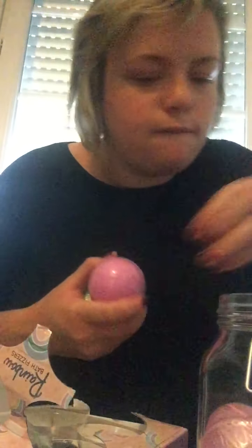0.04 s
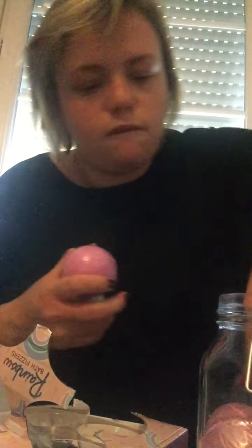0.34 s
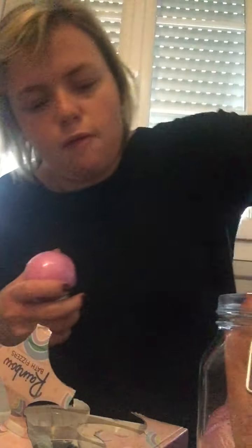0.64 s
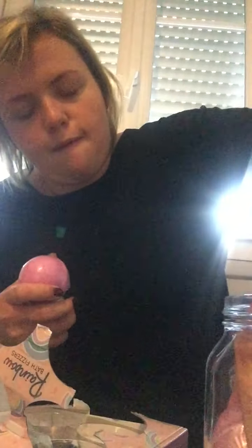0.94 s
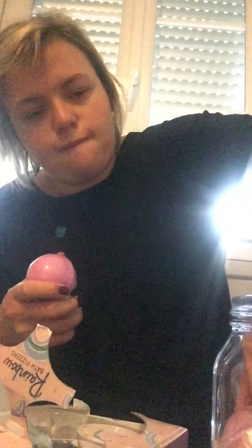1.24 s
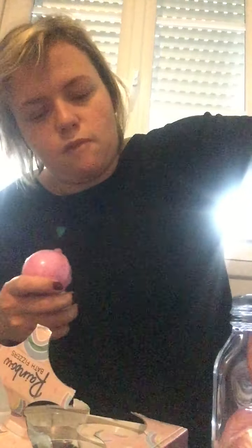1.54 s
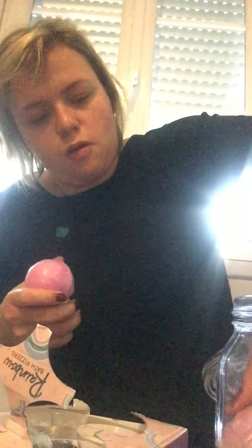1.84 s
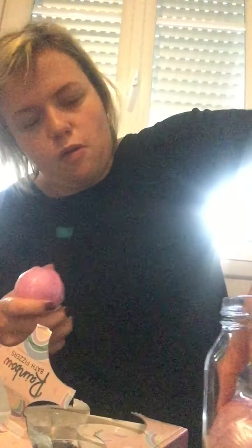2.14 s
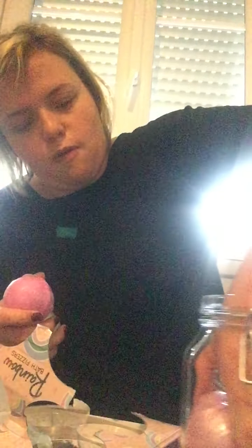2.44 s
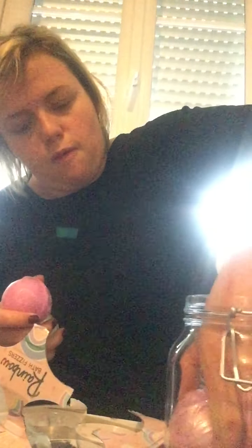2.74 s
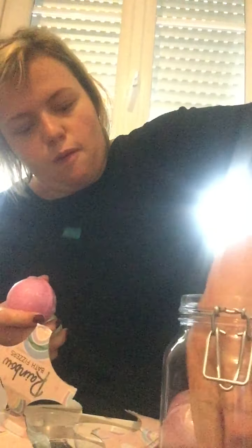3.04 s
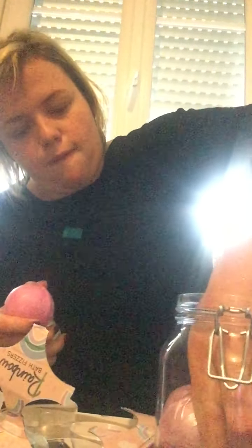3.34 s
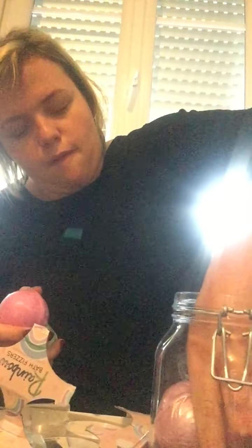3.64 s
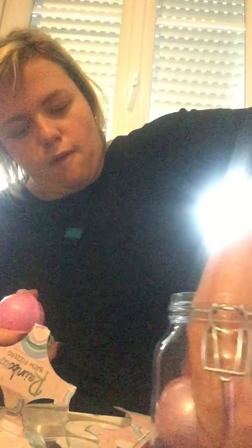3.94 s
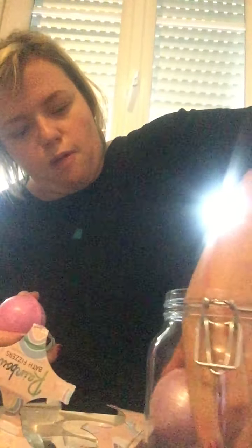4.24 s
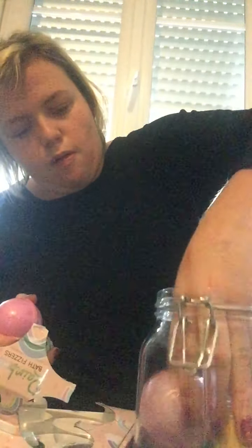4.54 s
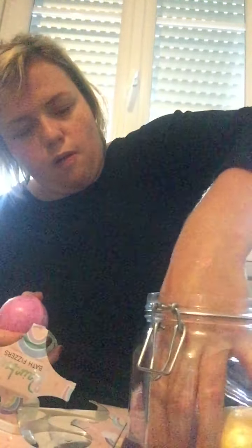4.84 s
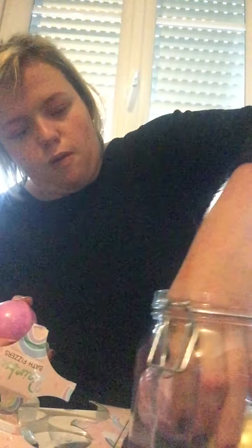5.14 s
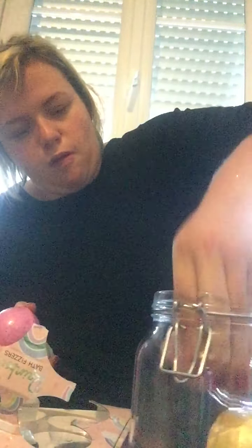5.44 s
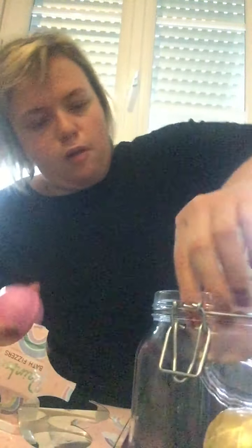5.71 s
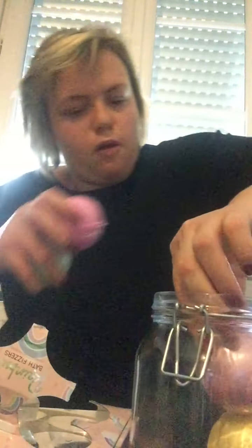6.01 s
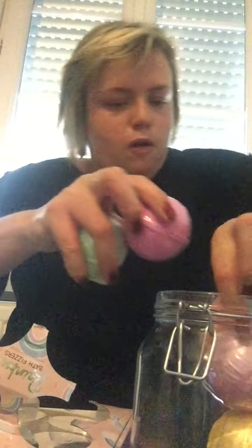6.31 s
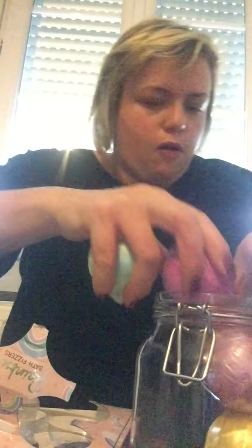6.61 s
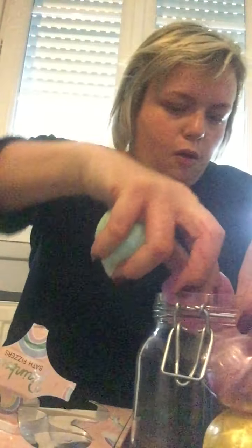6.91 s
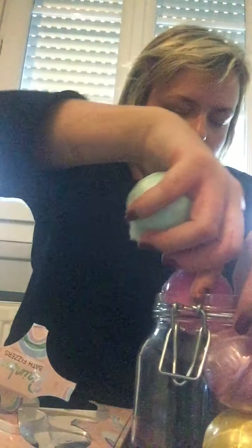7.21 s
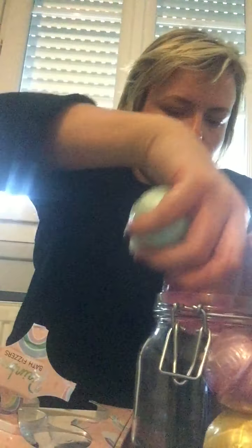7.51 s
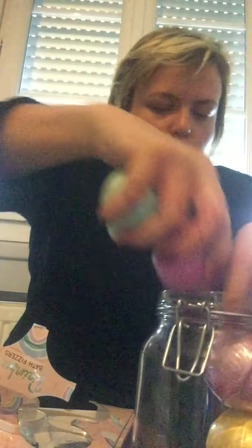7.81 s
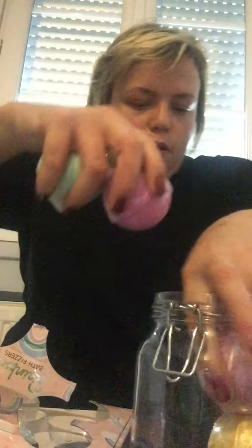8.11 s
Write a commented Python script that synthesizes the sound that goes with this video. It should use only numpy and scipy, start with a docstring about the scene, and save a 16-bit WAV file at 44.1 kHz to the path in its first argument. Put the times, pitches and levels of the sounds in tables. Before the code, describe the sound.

A hand packs wrapped balls into a glass jar: clusters of clinks and hollow bumps, separated by soft scraping and fingernail ticks.

```python
"""A small room, the microphone close to a big glass jar on a table. A hand packs hard round bath bombs in.
Balls, fingernails and a wire clasp clink on the glass, and the balls clack as they spring off the wall. Soft
bumps shake the table and sound the air in the jar, lower as the hand covers its mouth. In between, the wrapped
balls and the arm rub along the wall and the wrapping crackles. Behind it all are the echoes of nearby walls and
a faint hush."""
import sys
import numpy as np
from scipy import signal
from scipy.fft import rfft, irfft, next_fast_len
from scipy.io import wavfile
from scipy.ndimage import uniform_filter1d

SR = 44100
rng = np.random.default_rng(int(sys.argv[2]) if len(sys.argv) > 2 else 0)


def pcm_store(signal):
    """Save signal as 16-bit PCM."""
    levels = np.round(np.clip(np.atleast_2d(signal), -1, 1) * 32767)
    wavfile.write(sys.argv[1], SR, levels.astype(np.int16).T)


N = 364266
TIME = np.arange(N) / SR
AGE = TIME[:SR]  # seconds since an event began

# modes of the jar's wall: f/Hz, level/dB, t60/s
GLASS_MODES = [(1030, -5, .1), (1165, -4, .2), (1240, -6, .15), (1390, -10, .17), (1470, -13, .17),
               (1810, -4, .24), (1860, 2, .24), (1900, 1, .22), (1945, 2, .22), (2020, -2, .22),
               (2295, -5, .13), (2470, -10, .12), (2800, -16, .14), (3610, -6, .18), (3740, -3, .26),
               (3915, -3, .14), (3985, -2, .19), (4505, -1, .08), (5250, -10, .12), (5390, -7, .12),
               (5800, -9, .08), (6455, -12, .1), (6870, -13, .12), (7080, -15, .1), (7680, -12, .08),
               (9470, -4, .06), (12590, -16, .04)]
# spectrum of the dense, short-lived modes in the first crack: f/Hz, level/dB
CRACK_SPECTRUM = [(700, 1.5), (1100, -1), (1500, 1), (1950, 13), (2350, 6.5), (2850, -5.5), (3750, 2),
                  (4800, -10), (5500, -5), (7400, -7.5), (8600, -15.5), (9600, -11.5), (16000, -15.5)]
# a ball meets the glass, close up: t/s, level/dB at 1.5-3 kHz, body/dB re that band, cut-off/Hz, ring/dB
CLINKS = [(0.295, -57.5, -0.5, 4830, 0), (0.7588, -58, -8, 6130, 0.5), (0.8769, -58.5, -2, 3960, -21),
          (1.4731, -52, -10, 2450, -2), (1.5273, -55.5, -3.5, 8800, -10), (1.8735, -50, -13, 2100, -3),
          (2.228, -44, 2, 2700, -11.5), (2.519, -53, -9, 3170, -46), (2.6057, -49, -6, 3030, -18),
          (2.6933, -42.5, -3.5, 3430, -40), (3.556, -56.5, -25, 5460, -29), (3.998, -53, -19, 8000, -4),
          (4.0295, -35, -2.5, 6500, -15.5), (4.067, -43.5, 4, 3500, -10), (4.0971, -20, -2.5, 3400, -14),
          (4.132, -38, -1, 3840, -16), (4.6396, -41, -2, 7150, 5), (4.645, -43, -6.5, 7450, -8),
          (4.809, -40.5, 0.5, 2800, -14.5), (4.8338, -48, -2, 4100, -16),
          (5.5512, -47.5, -6.5, 5300, -10.5), (5.836, -51, -3, 3540, -6), (5.9703, -26.5, 1, 3720, -10.5),
          (6.3189, -56, 7.5, 3560, -5), (6.4015, -58, 1, 5000, 11.5), (6.5851, -55.5, -18.5, 3870, 4.5),
          (6.8717, -39.5, -3.5, 1867, -7), (7.603, -45.5, -16, 7460, -15.5),
          (7.7869, -43.5, -12, 2660, -22), (7.9428, -45.5, -15.5, 3650, 6), (8.001, -51.5, -1.5, 3670, 13),
          (8.1032, -39, -16, 7600, -12), (8.133, -49, 3, 3700, 11), (8.1735, -42, -2, 7300, -7),
          (8.2047, -25, -1.5, 2750, -10.5), (8.244, -41.5, -20, 6500, -14)]
def clinks(crack_t60=0.029, touch_s=0.0031, hard_blow_db=-22, ring_trim_db=10, trim_db=1.5):
    """A hard contact: a gritty crack, a rattle of the pile, and the wall's ring, damped by the hand."""
    out = np.zeros(N)
    rise = onset(0.001)
    free_share = 0.18  # of the ring escapes the hand
    grip = rise * (free_share + (1 - free_share) * fade(0.15))
    # the glass ring wavers, each mode fading unevenly as heard through the room
    wall = ringing(GLASS_MODES) * (1 + 2.6 * waver(len(GLASS_MODES), rate_hz=80))
    for start, db, body_db, cutoff_hz, ring_db in CLINKS:
        grit_times = AGE[::50]
        grit = undb(3 * np.interp(AGE, grit_times, rng.standard_normal(len(grit_times))))
        # the harder the blow, the longer the ball chatters on the glass and the more the pile rattles
        force = undb(0.64 * (db - hard_blow_db))
        contact = np.minimum(fade(crack_t60) * undb(60 * touch_s * force / crack_t60), 1)
        rattle = force * undb(-21) * fade(0.2)
        crack = peak(crack_noise() * grit * rise * (contact + rattle), 0)
        detune = 1 + 0.009 * rng.uniform(-1, 1)  # the load on the wall differs each time
        ring = np.interp(AGE * detune, AGE, strike(wall))
        sound = crack + peak(ring * grip, ring_db + ring_trim_db)
        add(out, start, set_bands(sound, db + trim_db, contact_tone(body_db, cutoff_hz)))
    return out


def crack_noise(scatter_db=3):
    """Every spot on the jar favours other overtones: noise with chance peaks and dips."""
    hz, db = np.transpose(CRACK_SPECTRUM)
    grid_hz = np.geomspace(hz[0], hz[-1], 40)
    spot_db = np.interp(np.log(grid_hz), np.log(hz), db) + scatter_db * rng.standard_normal(len(grid_hz))
    return colour(rng.standard_normal(SR), np.column_stack([grid_hz, spot_db]))


def contact_tone(body_db, cutoff_hz, fall_db_per_octave=17):
    """Body, middle, bright and top band in dB re the middle: a softer contact lasts longer, so is duller."""
    octaves = np.log2(np.array([2100, 3900, 8000]) / cutoff_hz)
    loss_db = 10 * np.log10(1 + undb(2 * fall_db_per_octave * octaves))
    return np.append(body_db, loss_db[0] - loss_db)


# edges of a contact's body, middle, bright and top band: f/Hz
BAND_EDGES = [700, 1500, 3000, 5000, 16000]
def set_bands(sound, db, tone):
    """Set the peak level of each of the four bands of a contact."""
    bands = zip(BAND_EDGES, BAND_EDGES[1:], tone)
    return sum(peak(band(sound, lo, hi, order=3), db + tone_db) for lo, hi, tone_db in bands)


# modes of the table under the jar: f/Hz, level/dB, t60/s
TABLE_MODES = [(55, -19, .22), (79, -11, .22), (101, -11, .2), (127, -2, .4), (165, -7, .2), (190, -5, .3),
               (222, -5, .22), (255, -7, .15)]
# soft bumps on the jar: t/s, level/dB, air note f/Hz, thud/dB and table/dB (both added to the level)
BUMPS = [(0.123, -56.5, 373, -2, -44), (0.143, -55, 331, -3, -35), (1.499, -52, 367, -6.5, -35),
         (4.041, -30, 378.6, 7.5, -6), (4.388, -36, 378, -3.5, -9), (4.657, -41.5, 463, -1, -8.5),
         (4.807, -37, 474, 3.5, -9), (5.324, -50, 382, -9.5, -28.5), (5.349, -40, 384.7, -28.5, -21.5),
         (5.495, -57.5, 375, -20.5, -10), (5.579, -43.5, 394, -37, -16.5), (5.693, -51, 387, -17, -18),
         (5.763, -43, 409, -10, -10.5), (5.9698, -33, 480, 15, -12), (5.976, -17.5, 435, -27, -13.5),
         (6.3186, -28.5, 438, -7.5, -47), (6.402, -52, 483, -18, -39), (6.873, -42.5, 348.5, -1, -15),
         (6.906, -47, 364, -8, -19), (7.605, -52, 372, -14, -8.5), (7.694, -25.5, 337, 2, -20),
         (8.003, -51, 334, 1.5, -0.5), (8.133, -54, 472, 19.5, 10.5), (8.225, -36, 418, -1, -3.5)]
def bumps(air_trim_db=-0.5, table_trim_db=-5):
    """A soft push on the jar: a dead thud, the hollow note of the air inside, the table booming below."""
    out, table = np.zeros(N), ringing(TABLE_MODES)
    for start, db, hz, thud_db, table_db in BUMPS:
        # the more the hand closes the mouth, the lower the air note and the longer it rings
        air_t60 = 0.068 * (400 / hz) ** 4
        blur = 1 + 0.2 * waver(1, rate_hz=70)[0]  # the hand moves in the mouth
        air = (np.exp(2j * np.pi * hz * AGE) * blur).imag * fade(air_t60) * onset(0.0016)
        boom = strike(table) * onset(0.0076)
        pile_shudder = undb(-27) * rng.standard_normal(SR) * fade(0.081) / 2
        thud = band(signal.unit_impulse(SR) + pile_shudder, 400, 840, order=3)
        add(out, start, peak(air, db + air_trim_db) + peak(thud, db + thud_db))
        add(out, start, peak(boom, db + table_db + table_trim_db))
    return out


# low notes of the room: f/Hz, level/dB, t60/s
ROOM_MODES = [(126, 0, .42), (188, -6, .4)]
# heavy landings in the jar: t/s, thump/dB, boom/dB
LANDINGS = [(4.041, -35.5, -47.5), (5.974, -33.5, -40.5), (7.696, -27.5, -42)]
def landings(thump_hz=205, bloom_s=0.042):
    """A ball lands with its whole weight: the jar thumps the table, then the room's low notes bloom."""
    out, modes = np.zeros(N), ringing(ROOM_MODES)
    thump = np.sin(2 * np.pi * thump_hz * AGE) * fade(0.051)
    bloom = 1 - np.exp(-(AGE / bloom_s) ** 2)
    for start, thump_db, boom_db in LANDINGS:
        boom = strike(modes, scatter_db=0.5) * bloom
        add(out, start, peak(thump, thump_db) + peak(boom, boom_db))
    return out


# a ball rebounds from the jar's wall: t/s, level/dB, starting f/Hz
CLACKS = [(0.295, -63, 794), (1.474, -57, 697), (2.228, -40, 803), (4.097, -28, 816), (4.137, -32, 847),
          (4.808, -36.5, 717), (8.207, -28.5, 855)]
def clacks(open_ratio=1.6, open_s=0.01):
    """The thin air gap between a ball and the wall it parts from rings briefly, its pitch rising as the gap
    opens."""
    out = np.zeros(N)
    glide = 1 + (open_ratio - 1) * onset(open_s)
    for start, db, hz in CLACKS:
        tone = np.sin(2 * np.pi * np.cumsum(hz * glide) / SR)
        add(out, start, peak(tone * onset(0.046) * fade(0.032), db))
    return out


# a tick's body, middle, bright and top band: relative level/dB
TICK_TONE = [-4, -4, 3, 2.5]
# fingernails and a wire clasp on the glass, close up: t/s, level/dB, ring/dB re the crack
TICKS = [(0.409, -67, 5), (1.5835, -68, 9), (2.2213, -53.5, 2), (2.241, -58, 1), (2.6481, -54, -5),
         (3.027, -56, -6), (3.1364, -61, 1), (3.3352, -55.5, 4), (3.354, -58.5, -5.5),
         (5.3097, -56.5, -7.5), (5.36, -59, -6.5), (5.7609, -49, -18), (6.413, -57, 3),
         (6.875, -58, -19.5), (7.1037, -53, 2.5), (7.887, -65, 7)]
def ticks():
    """A tiny contact: a dry click rings the wall, and the touch stops it at once."""
    out, wall = np.zeros(N), ringing(GLASS_MODES)
    for start, db, ring_db in TICKS:
        ring = peak(strike(wall) * fade(0.026), ring_db)
        crack = peak(crack_noise() * fade(0.015), 0)
        add(out, start, set_bands((ring + crack) * onset(0.0013), db, TICK_TONE))
    return out


# spectra of the scrape on the glass and of the jar's rumble on the table: f/Hz, level/dB
SCRAPE_SPECTRUM = [(210, -10.5), (350, 1.5), (548, -7.5), (779, -12), (1040, -0.5), (1200, 2), (1650, -4),
                   (2030, -6), (2420, -7), (4520, -8.5), (4900, -14), (6430, -15.5), (8310, -23.5),
                   (15000, -34.5), (16000, -26.5)]
RUMBLE_SPECTRUM = [(21, -38), (35, -14), (118, 0), (150, 0), (232, -2.5), (280, -20.5), (338, -8.5),
                   (379, -22.5), (419, -11.5), (559, -24.5), (700, -38), (910, -55), (1540, -120)]
# a ball or the arm slides along the wall: t/s, length/s, scrape/dB, rumble/dB, treble tilt/(dB per octave)
STROKES = [(0.287, 0.086, -97, -59, 0), (0.494, 0.32, -93, -71, -8), (0.78, 0.048, -57.5, -57, 2.5),
           (0.814, 0.07, -61.5, -62, 3), (0.897, 0.096, -74, -59, 8), (1.157, 0.071, -56, -53, 7),
           (1.278, .08, -94, -68, -7), (1.462, 0.049, -58, -54.5, 2), (1.768, 0.069, -56, -59, 1.5),
           (2.103, 0.066, -62.5, -69, -1), (2.165, 0.052, -53, -55.5, 1), (2.481, 0.13, -58, -58.5, 1.5),
           (2.618, 0.057, -47.5, -56, -4), (2.696, 0.044, -56, -59, -10), (2.94, 0.075, -65, -71.5, -3),
           (3.372, 0.069, -60.5, -58, -2.5), (3.514, 0.064, -60, -78, -3.5), (3.62, 0.15, -71.5, -78, -10),
           (3.965, 0.053, -55.5, -68.5, 3), (4.688, 0.18, -56.5, -60, 3.5), (4.903, .09, -99, -69.5, -6.5),
           (5.29, 0.12, -62.5, -68.5, 3), (6.926, 0.1, -54, -68, -1), (7.08, 0.13, -60.5, -68.5, -16.5),
           (7.212, 0.058, -56.5, -64.5, 0), (7.278, .15, -65.5, -70, -7.5),
           (7.512, 0.11, -63.5, -77.5, 4.5), (7.61, 0.11, -51, -57, 2)]
def rubbing(grains_per_s=700, snags_per_s=100, tilt_from_hz=3000, scrape_trim_db=-3.5, rumble_trim_db=-1):
    """Rough wrapping catches and slips on the glass in tiny grains; the jar judders on the table."""
    sizes = undb(-np.minimum(rng.exponential(size=N), 3)) * rng.choice([-1, 1], N)
    grains = unit((rng.random(N) < grains_per_s / SR) * sizes)
    snags = undb(-1) * unit((rng.random(N) < snags_per_s / SR) * sizes)  # a crease catches now and then
    hiss = undb(-7) * rng.standard_normal(N)
    friction = (grains + snags + hiss) * flicker(depth_db=3, rate_hz=80)
    judder = colour(rng.standard_normal(N) * flicker(depth_db=3, rate_hz=31), RUMBLE_SPECTRUM)
    overrun = 1.2  # the scrape spills over both ends of its stroke
    out = np.zeros(N)
    for start, length, scrape_db, rumble_db, tilt in STROKES:
        # dry wrapping is crisp, skin is dull
        spectrum = [(hz, db + tilt * max(np.log2(hz / tilt_from_hz), 0)) for hz, db in SCRAPE_SPECTRUM]
        scrape = colour(np.roll(friction, -int(start * SR))[:SR], spectrum)
        progress = np.minimum(AGE / (overrun * length), 1)
        pressure = np.abs(np.sin(np.pi * progress)) ** 0.49
        add(out, start - (overrun - 1) * length / 2, undb(scrape_db + scrape_trim_db) * pressure * scrape)
        shaking = gesture(start, length, attack_s=0.012, release_s=0.01)
        out += undb(rumble_db + rumble_trim_db) * shaking * judder
    return out


# creases in the wrapping, close up: t/s, level/dB, centre f/Hz
CRINKLES = [(0.797, -56, 9000), (1.218, -66, 7500), (1.23, -76, 7000), (1.814, -63, 3500),
            (2.122, -63, 3560), (2.565, -61.5, 5000), (2.7575, -71, 2980), (2.826, -70, 3500),
            (2.847, -73, 2500), (2.887, -63, 1980), (2.968, -69, 3000), (3.404, -58.5, 3500),
            (3.453, -58.5, 3360), (3.486, -59.5, 3200), (3.504, -64, 3500), (3.566, -57, 4300),
            (7.802, -49.5, 3100)]
def crinkles(band_ratio=1.7, trim_db=-2):
    """A crease in the wrapping snaps over: one soft little crackle."""
    out = np.zeros(N)
    for start, db, hz in CRINKLES:
        snap = rng.standard_normal(SR) * onset(0.0015) * fade(0.016)
        add(out, start, peak(band(snap, hz / band_ratio, hz * band_ratio), db + trim_db))
    return out


# skin drags on the glass: t/s, length/s, level/dB
SKIN_DRAGS = [(1.914, 0.061, -64), (3.878, .14, -70)]
def glass_singing(cluster_hz=(1780, 2060)):
    """Friction feeds the cluster of strongest wall modes, which sing faintly."""
    drag = sum(undb(db) * gesture(start, length, attack_s=0.046, release_s=0.031)
               for start, length, db in SKIN_DRAGS)
    return unit(band(rng.standard_normal(N), *cluster_hz)) * drag


# the small room's echoes at the microphone: f/Hz, t60/s, level/dB
ROOM_DECAY = [(101, 0.75, -0.5), (410, 0.49, -9.5), (910, 0.68, -20.5), (1860, 0.77, -7.5),
              (3850, 0.83, -11), (8250, 0.19, -6.5), (16080, .3, -13.5)]
def room_echoes(direct, first_echo_s=0.0027, build_s=0.004):
    """Diffuse echoes from nearby walls, in half-octave bands; the top treble dies first."""
    hz, t60, db = np.transpose(ROOM_DECAY)
    response = np.zeros(SR)
    build = 1 - np.exp(-np.maximum(AGE - first_echo_s, 0) / build_s)
    spectrum, bin_hz = rfft(rng.standard_normal(SR)), np.arange(SR // 2 + 1)
    for lo_hz in 40 * 2 ** np.arange(0, 9, 0.5):
        log_centre = np.log(lo_hz * 2 ** 0.25)
        shape = build * fade(np.interp(log_centre, np.log(hz), t60))
        gain = undb(np.interp(log_centre, np.log(hz), db))
        echoes = irfft(spectrum * ((bin_hz >= lo_hz) & (bin_hz < lo_hz * np.sqrt(2))), SR)
        response += gain * echoes * shape / np.linalg.norm(shape)
    return signal.fftconvolve(direct, response)[:N]


# the quiet room at the microphone: f/Hz, relative level/dB
HUSH_SPECTRUM = [(18, -9), (30, -3), (189, -1.5), (266, -5), (355, -3.5), (499, -10.5), (684, -6.5),
                 (740, -12), (1910, -14), (2830, -18), (3870, -18.5), (4910, -20), (6550, -20.5),
                 (14800, -29.5), (16000, -37.5)]
def room_tone(hush_db=-70.5, hum_hz=684, hum_db=-86):
    """The faint steady hush of the room, with a thin hum in it."""
    hush = undb(hush_db) * colour(rng.standard_normal(N), HUSH_SPECTRUM)
    return hush + undb(hum_db) * unit(np.sin(2 * np.pi * hum_hz * TIME))


def undb(db):
    """Decibels to gain."""
    return 10 ** (np.asarray(db) / 20)


def unit(x):
    """Scale to rms 1."""
    return x / np.sqrt(np.mean(x ** 2))


def peak(x, db):
    """Scale so that the loudest 4 ms have this level."""
    return x * undb(db) / np.sqrt(uniform_filter1d(x ** 2, size=176).max())


def onset(rise_s):
    """Rise from 0 towards 1 with this time constant."""
    return 1 - np.exp(-AGE / rise_s)


def fade(t60):
    """Exponential decay, 60 dB down after t60 seconds."""
    return np.exp(-np.log(1000) * AGE / t60)


def gesture(start, length, attack_s, release_s):
    """Swell, hold, and die away once the movement stops."""
    swell = np.clip((TIME - start) / attack_s, 0, 1)
    return swell * np.exp(-np.maximum(TIME - start - length, 0) / release_s)


def band(x, lo_hz, hi_hz, order=2):
    """Causal band-pass."""
    return signal.sosfilt(signal.butter(order, [lo_hz, hi_hz], "band", fs=SR, output="sos"), x + 1e-18)


def colour(x, points):
    """Filter x by a curve of (f/Hz, level/dB) points; rms 1."""
    hz, db = np.transpose(points)
    size = next_fast_len(len(x))
    bin_hz = np.maximum(np.fft.rfftfreq(size, 1 / SR), 1)
    gain = undb(np.interp(np.log(bin_hz), np.log(hz), db))
    return unit(irfft(rfft(x, size) * gain, size)[:len(x)])


def flicker(depth_db, rate_hz):
    """A gain that wanders at random through the whole scene."""
    knots = rng.standard_normal(N // 100)
    return undb(depth_db * np.interp(TIME * rate_hz, np.arange(len(knots)), knots))


def waver(count, rate_hz):
    """Random complex drift over one second, one row per mode."""
    knots = rng.standard_normal((count, 400, 2)) @ np.array([1, 1j]) / np.sqrt(2)
    return np.array([np.interp(AGE * rate_hz, np.arange(len(row)), row) for row in knots])


def ringing(modes):
    """One decaying complex tone per mode."""
    return np.array([undb(db) * fade(t60) * np.exp(2j * np.pi * hz * AGE) for hz, db, t60 in modes])


def strike(tones, scatter_db=3):
    """Each point of contact excites the modes with its own strengths and phases."""
    strengths = undb(scatter_db * rng.standard_normal(len(tones)))
    phases = np.exp(2j * np.pi * rng.random(len(tones)))
    return ((strengths * phases) @ tones).imag


def add(track, start, sound):
    """Mix a sound in at start seconds."""
    i = max(int(start * SR), 0)
    track[i:i + len(sound)] += sound[:N - i]


def scene():
    """Jar, table and hand close to one microphone, the room behind them."""
    knocks = clinks() + ticks() + clacks() + bumps() + landings()
    direct = knocks + rubbing() + crinkles() + glass_singing()
    return (direct + room_echoes(direct) + room_tone())[None]


def record(dry, low_cut_hz=38, top_hz=16000):
    """The microphone cuts the deep bass and the top."""
    thin = signal.sosfilt(signal.butter(3, low_cut_hz, "high", fs=SR, output="sos"), dry)
    return signal.sosfilt(signal.ellip(10, 0.2, 70, top_hz, fs=SR, output="sos"), thin)


dry = scene()
out = record(dry)
pcm_store(out)
```